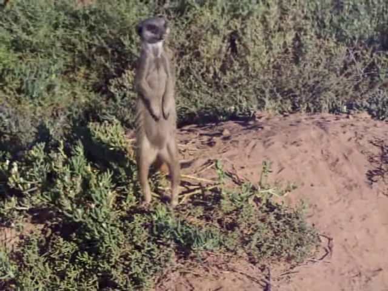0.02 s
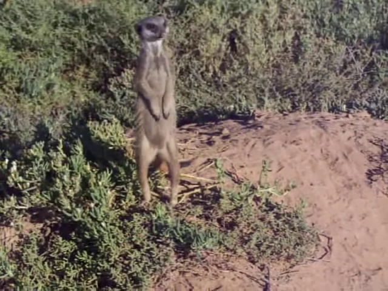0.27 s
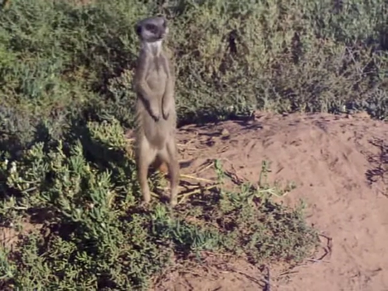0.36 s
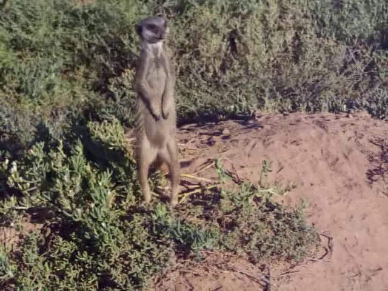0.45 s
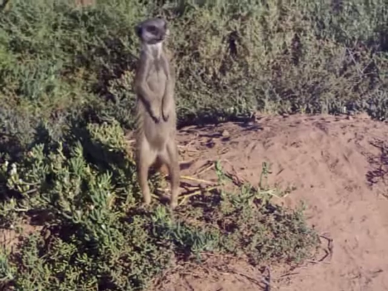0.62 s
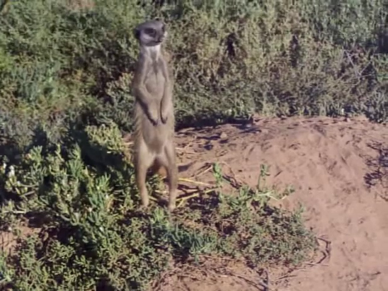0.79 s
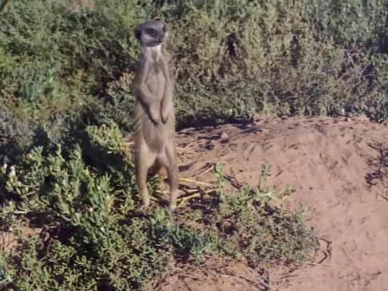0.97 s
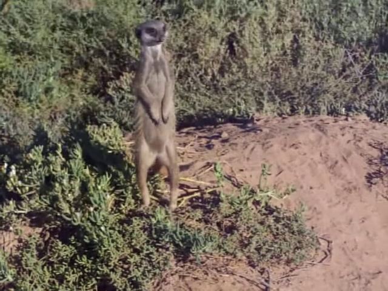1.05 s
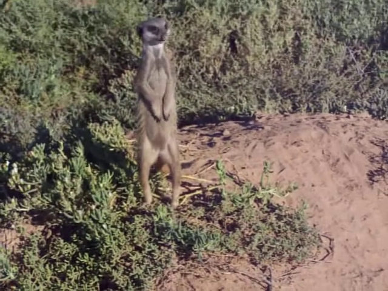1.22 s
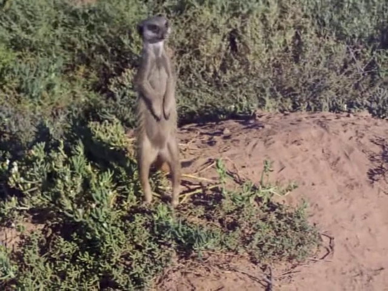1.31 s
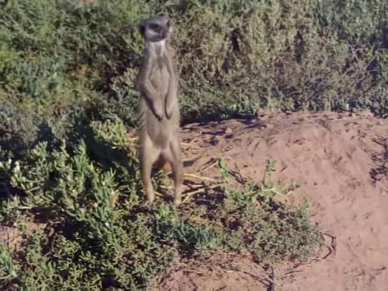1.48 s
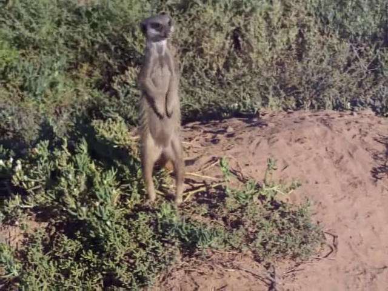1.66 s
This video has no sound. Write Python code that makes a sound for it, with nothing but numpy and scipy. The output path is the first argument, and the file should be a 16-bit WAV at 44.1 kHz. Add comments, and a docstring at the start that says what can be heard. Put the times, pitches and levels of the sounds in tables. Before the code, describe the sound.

Four evenly spaced, raspy meerkat alarm barks, each rising quickly and stopping short, with faint echoes from sand and bushes. Thin, high bird whistles come and go between them over quiet open-air rumble, in mono.

```python
"""Open sandy scrubland, where a meerkat on sentry duty gives four short, harsh barks.
Each bark is a rising tone that flutters about ninety times a second in pitch and strength,
shaped by the throat, with a rasp of gliding noise on top. Sand and bushes send it back as echoes,
and faint sinking tones trail the barks. A small bird, made of gliding pure tones, whistles some way off.
Filtered noise gives a low outdoor rumble, a soft hiss, a low drone and one faint tick near the start."""
import sys
import numpy as np
from scipy import signal
from scipy.fft import rfft, irfft
from scipy.io import wavfile
from scipy.ndimage import uniform_filter1d

SR = 44100
rng = np.random.default_rng(int(sys.argv[2]) if len(sys.argv) > 2 else 0)


def store_wav(level_fs):
    """Save 16-bit WAV to argv[1]."""
    pcm = np.round(np.clip(np.atleast_2d(level_fs), -1, 1) * 32767)
    wavfile.write(sys.argv[1], SR, pcm.T.astype(np.int16))


N = 74970  # length in samples, 1.7 seconds


def meerkat(t):
    """Each bark is a fluttering voice shaped by the throat, plus a rasp that pulses with the flutter."""
    # The barks. Each row: start in seconds, time to the loudest point in seconds, level in dB,
    # pitch in Hz, flutter rate in Hz.
    barks = [(0.1675, 0.062, 0.5, 868.6, 91.54), (0.5739, 0.064, -.5, 871.2, 91.9),
             (0.9753, 0.062, -.5, 872.6, 90), (1.3418, 0.068, 0.45, 874.8, 90.4)]
    # Pitch path of every bark. Each row: seconds from the loudest point, share of the bark's pitch.
    contour = np.array([(-.065, 0.63), (-.047, .76), (-.033, .89), (-.017, 0.93), (0, 1.015), (.02, 1.05),
                        (.06, 0.74)])
    # How strongly the throat passes each pitch. Each row: frequency in Hz, gain in dB.
    throat = [(480, -26.5), (610, 2.5), (760, -4), (900, -4.5), (1120, 9.5), (1270, -14), (1520, -1.5),
              (1800, -2.5), (1990, -3.5), (2140, -25.5), (2320, 2), (2650, -16.5), (3050, -7), (4000, -0.5)]
    flutter_depth, flutter_jitter, pitch_jitter = 0.12, 0.0075, 0.026  # shares of pitch, flutter rate, pitch
    flutter_dip_db, onset_dip_db, onset_s = 7.5, 23, 0.063  # the dips are deeper as the bark starts
    closure_power = 4.4  # a higher power makes the dips narrower

    voices, rasps = 0, 0
    unsteady = flutter_jitter * walk(90)
    jitter = pitch_jitter * walk(707)
    for start, climb, bark_db, hz, flutter_hz in barks:
        dt = t - start - climb  # seconds from the loudest point
        drift = turns(flutter_hz * unsteady)
        drift = drift - np.interp(start + climb, t, drift)  # no drift at the loudest point
        flutter = np.cos(2 * np.pi * flutter_hz * (t - start) + drift)

        path = np.interp(dt, contour[:, 0], contour[:, 1])
        pitch = hz * path * (1 + flutter_depth * flutter + jitter)

        closed = ((1 - flutter) / 2) ** closure_power  # 1 at the bottom of each flutter
        before_peak = np.clip(-dt / onset_s, 0, 1)
        dip_db = closed * (flutter_dip_db + onset_dip_db * before_peak)

        attack = np.clip((t - start) / 0.012, 0, 1)  # the voice sets in over 12 ms
        voices = voices + attack * voice(dt, turns(pitch), bark_db - dip_db)
        rasps = rasps + rasp(dt, bark_db, closed)
    return colour(voices, throat) + rasps


def voice(dt, phase, strength_db):
    """Four whole-number multiples of the pitch, each swelling and fading at its own speed."""
    # The partials, first to fourth. Each row: level in dB before the throat, lag of the peak in seconds,
    # rise in dB per second, fall in dB per second.
    partials = [(-21, -0.019, 722, 532), (-11, 0.00013, 1124.5, 924.5), (-18, -0.0043, 1551, 848.5),
                (-43.5, -.003, 1303.5, 740.5)]
    out = 0
    for number, (level_db, lag, rise, fall) in enumerate(partials, start=1):
        shimmer_db = 1.6 * walk(560)  # small random changes in strength
        gain = undb(strength_db + level_db + shimmer_db) * swell(dt - lag, rise, fall)
        out = out + gain * np.sin(number * phase)
    return out


def rasp(dt, bark_db, closed):
    """Noise in several resonances that glide in frequency as the mouth moves."""
    # The resonances. Each row: frequency in Hz at the loudest point, glide in Hz per second, width in Hz,
    # level in dB, lag of the peak in seconds, rise in dB per second, fall in dB per second.
    resonances = [(2527, 6498, 456, -22.5, 0.0042, 1452.5, 879.5),
                  (3842.6, -4.5, 2320, -39, -0.0032, 1452.5, 903.5),
                  (5576, -3500, 260, -45, -0.0088, 947, 804),
                  (7250, -6000, 510, -40.5, -0.00056, 1603, 1148.5),
                  (7985, 17.5, 800, -52.5, -.006, 1150.5, 1148), (6590, 12, 300, -49.5, 0.02, 1452, 846.5)]
    pulse_db, glide_s = 4, 0.042  # the mouth moves this long before and after the loudest point
    out = 0
    for hz, glide, width, level_db, lag, rise, fall in resonances:
        grain = signal.hilbert(band(hz, width))
        # turning the complex noise moves its whole band up or down
        shift_hz = glide * np.clip(dt, -glide_s, glide_s)
        hiss = np.real(grain * np.exp(1j * turns(shift_hz)))
        gain = undb(bark_db + level_db - pulse_db * closed) * swell(dt - lag, rise, fall)
        out = out + hiss * gain
    return out


def echoes(x, t):
    """Delayed, weaker copies: one quick bounce off the sand and two late ones from far bushes."""
    # Echoes from far bushes. Each row: delay in seconds, level in dB before the colouring.
    far_echoes = [(0.095, -28.5), (.118, -34.5)]
    # Tone colour of the far echoes. Each row: frequency in Hz, gain in dB.
    echo_colour = [(500, -3), (950, 4.5), (1900, -17), (2450, -2), (2850, -5), (3300, -7.5), (4000, -9)]

    def late(delay):
        """The sound held back by a delay in seconds."""
        return np.interp(t - delay, t, x, left=0)

    ground = undb(-23) * late(0.0036)
    far = sum(undb(db) * late(delay) for delay, db in far_echoes)
    return ground + colour(far, echo_colour)


def scrub(x, t):
    """Faint blurred echo from bushes and ground: fading noise bands, with the low band lingering longest."""
    # The bands. Each row: middle in Hz, level in dB before the weighting by frequency,
    # time to fade by 60 dB in seconds.
    scatter = [(850, -17.5, 0.28), (1616, -20.5, 0.08), (2920, -24.5, 0.16), (5600, -13, .2)]
    late = np.maximum(t - 0.035, 0)  # the scatter starts after 35 ms
    response = 0
    for hz, db, t60 in scatter:
        fade = np.exp(-np.log(1000) * late / t60) * (late > 0)
        tail = band(hz, hz * 0.41) * fade
        weight = np.sqrt(hz / SR / np.sum(tail ** 2))  # energy in step with the band's frequency
        response = response + undb(db) * tail * weight
    return signal.fftconvolve(x, response)[:N]


def trails(t):
    """Faint, unsteady tones that sink after the barks."""
    # The tones. Each row: middle in seconds, pitch there in Hz, level in dB.
    tones = [(.40, 815, -51.5), (.745, 930, -65.5), (1.145, 862, -51)]
    fall_hz_per_s, spread_s, waver = -1900, 0.039, 0.037  # waver is a share of the pitch
    out = 0
    for middle, hz, db in tones:
        dt = t - middle
        pitch = (hz + fall_hz_per_s * dt) * (1 + waver * walk(150))
        gain = undb(db) * np.exp(-np.square(dt / spread_s))
        out = out + gain * np.sin(turns(pitch))
    return out


def bird(t):
    """Pure gliding tones: one winding whistle, arched chirps and upward chirps."""
    return whistle(t) + arched_chirps(t) + upward_chirps(t)


def whistle(t):
    """One sine wave whose pitch and strength wind from point to point."""
    # The winding phrase. Each row: time in seconds, pitch in Hz, level in dB, both before smoothing.
    phrase = [(.725, 4700, -60), (.733, 3700, -52.5), (0.749, 3260, -67), (0.763, 3170, -68),
              (0.785, 3680, -42), (0.791, 4120, -41.5), (0.816, 4030, -45), (0.836, 3800, -46.5),
              (.853, 3760, -49.5), (.874, 3980, -44), (0.89, 4500, -45), (.899, 4900, -48),
              (.911, 4250, -43), (0.916, 3000, -49)]
    at, hz, db = np.array(phrase).T
    gain = uniform_filter1d(np.interp(t, at, undb(db), left=0, right=0), size=130)
    pitch = uniform_filter1d(np.interp(t, at, hz), size=180)  # sizes in samples
    return gain * np.sin(turns(pitch))


def arched_chirps(t):
    """Sine waves that climb to a top pitch and drop again, loudest at the top."""
    # The chirps. Each row: time of the top in seconds, top pitch in Hz, level in dB,
    # rise in seconds, fall in seconds.
    arches = [(.360, 4392, -61, .026, 0.062), (1.019, 4810, -41.5, .018, .014),
              (1.148, 4820, -41, 0.02, 0.018)]
    drop_hz, fade_db = 1500, 8
    out = 0
    for top, hz, db, rise, fall in arches:
        away = np.minimum(np.square((t - top) / np.where(t < top, rise, fall)), 10)
        pitch = hz - drop_hz * 2 * np.tanh(away / 2)  # the drop levels off far from the top
        gain = undb(db - fade_db * away ** 2)
        out = out + gain * np.sin(turns(pitch))
    return out


def upward_chirps(t):
    """Short sine waves that sweep quickly and steadily upward."""
    # The chirps. Each row: middle in seconds, pitch there in Hz, level in dB.
    upslurs = [(0.089, 4800, -46.5), (.317, 4750, -47)]
    sweep_hz_per_s, rise_s, fall_s = 57000, 0.010, 0.014
    out = 0
    for middle, hz, db in upslurs:
        dt = t - middle
        away = np.square(dt / np.where(dt < 0, rise_s, fall_s))
        gain = undb(db) * np.exp(-np.square(away))
        out = out + gain * np.sin(turns(hz + sweep_hz_per_s * dt))
    return out


def tick(t):
    """One faint, dull tick: a very short burst of filtered noise."""
    # Tone colour of the tick. Each row: frequency in Hz, gain in dB.
    tick_colour = [(100, -40), (500, -18), (900, 2), (1400, 11), (2200, -8), (3200, -25), (7000, -70)]
    middle_s, width_s, peak_db = 0.016, 0.0009, -32
    burst = rng.standard_normal(N) * np.exp(-np.square((t - middle_s) / width_s))
    knock = colour(burst, tick_colour)
    return undb(peak_db) * knock / np.max(np.abs(knock))


def outdoors():
    """Filtered noise for the low rumble and soft hiss of open country, with a wavering low drone."""
    # Tone colour of the air. Each row: frequency in Hz, relative strength in dB.
    air_colour = [(15, -43), (25, -0.5), (70, -4), (145, -7), (180, -10), (292, -14), (429, -15.5),
                  (601, -19), (677, -17), (764, -18.5), (1910, -27), (2150, -27.5), (4120, -28.5),
                  (4650, -30.5), (7900, -35), (10300, -62), (17400, -120)]
    # The background thins out at both ends. Each row: frequency in Hz, gain in dB.
    air_edges = [(25, -15), (42, 0), (7300, 3.5), (8000, -5.5), (8700, -8.5)]
    air = unit(colour(colour(rng.standard_normal(N), air_colour), air_edges))
    air_db = -49.5 + 0.5 * walk(15)  # the level wanders slightly
    drone = undb(-59) * band(73.5, 6.1)  # a narrow noise band
    return air * undb(air_db) + drone


def undb(db):
    """Turn decibels into a gain."""
    return 10 ** (np.asarray(db) / 20)


def unit(x):
    """Scale to an average strength (rms) of 1."""
    return x / np.sqrt(np.mean(x ** 2))


def colour(x, points):
    """Filter by a curve drawn through points of frequency in Hz and gain in dB."""
    hz, db = np.array(points, float).T
    f = np.maximum(np.fft.rfftfreq(N, 1 / SR), 1)
    gain = undb(np.interp(np.log(f), np.log(hz), db))
    return irfft(rfft(x) * gain, N)


def band(hz, width_hz):
    """Noise in a steep-sided resonance, rms 1."""
    f = np.fft.rfftfreq(N, 1 / SR)
    away = np.square((f - hz) / width_hz * np.sqrt(2))
    spectrum = rfft(rng.standard_normal(N)) / (1 + np.square(away))
    return unit(irfft(spectrum, N))


def walk(rate):
    """Smooth random wander with rms 1; a higher rate in Hz wanders faster."""
    return band(0, rate)


def turns(hz):
    """Add up a frequency curve into the running phase of a wave, in radians."""
    return 2 * np.pi * np.cumsum(hz) / SR


def swell(dt, rise, fall):
    """Gain that climbs and falls at steady dB rates around a rounded top."""
    crest_s = 0.02  # rounding of the top
    distance = np.hypot(dt, crest_s) - crest_s
    return undb(-np.where(dt < 0, rise, fall) * distance)


def scene():
    """Barks and their echoes, the bird and the background, in mono."""
    t = np.arange(N) / SR
    barks = meerkat(t)
    returned = echoes(barks, t) + scrub(barks, t)
    mix = barks + returned + trails(t) + bird(t) + tick(t) + outdoors()
    return mix[None]


def record(dry):
    """A steep low-pass filter cuts off the top above 9000 Hz."""
    low_pass = signal.ellip(10, 0.2, 80, 9000, fs=SR, output="sos")
    return signal.sosfilt(low_pass, dry)


dry = scene()
out = record(dry)
store_wav(out)
```